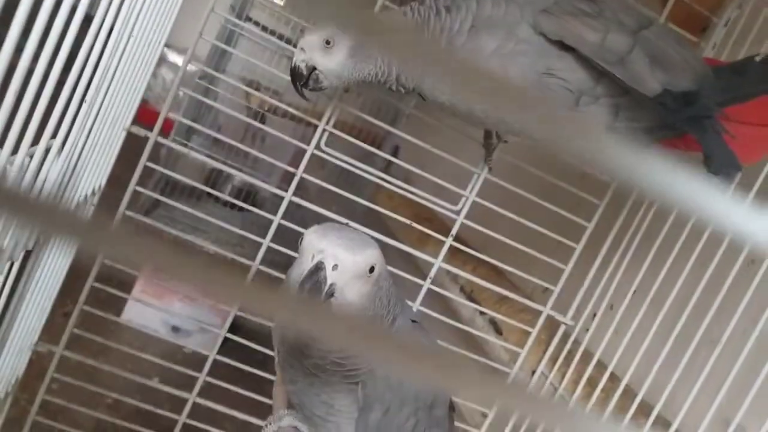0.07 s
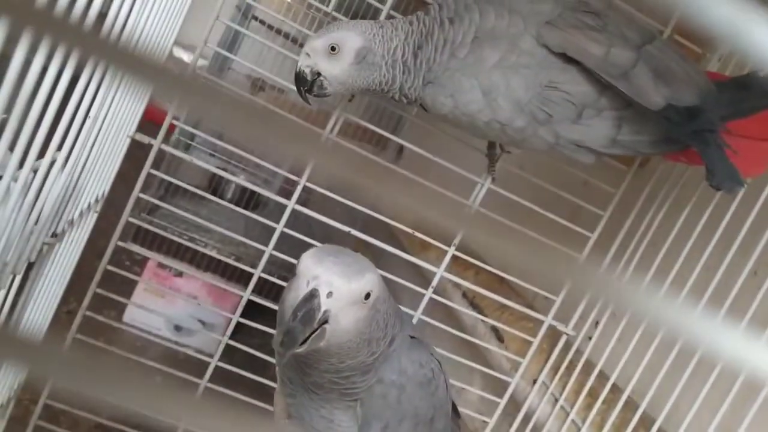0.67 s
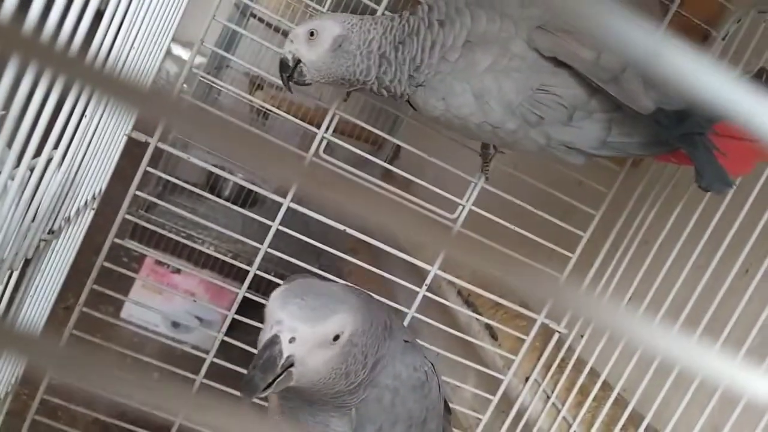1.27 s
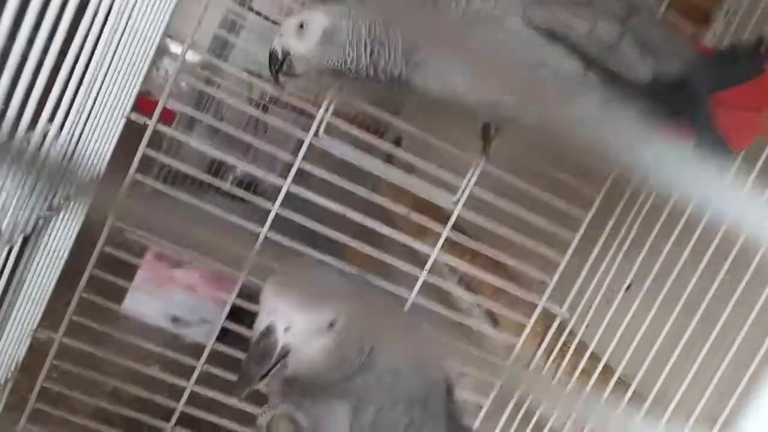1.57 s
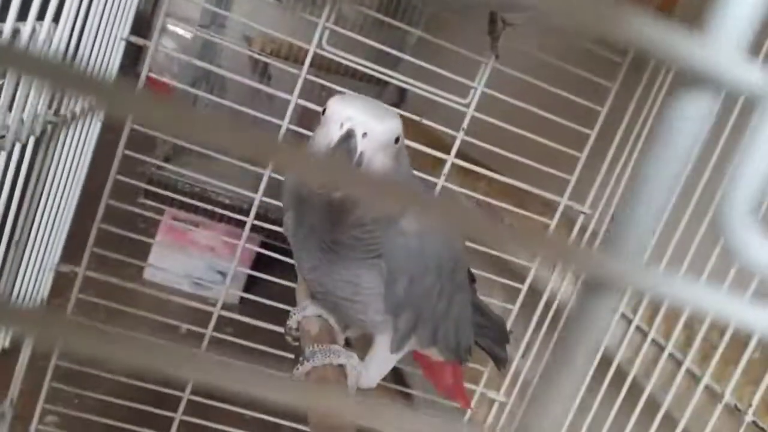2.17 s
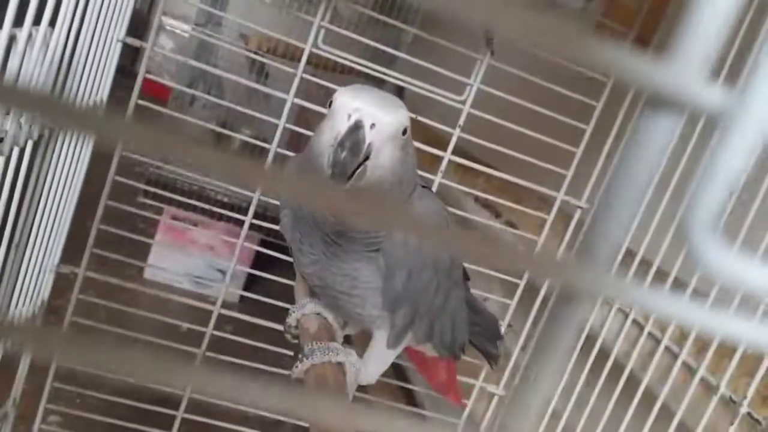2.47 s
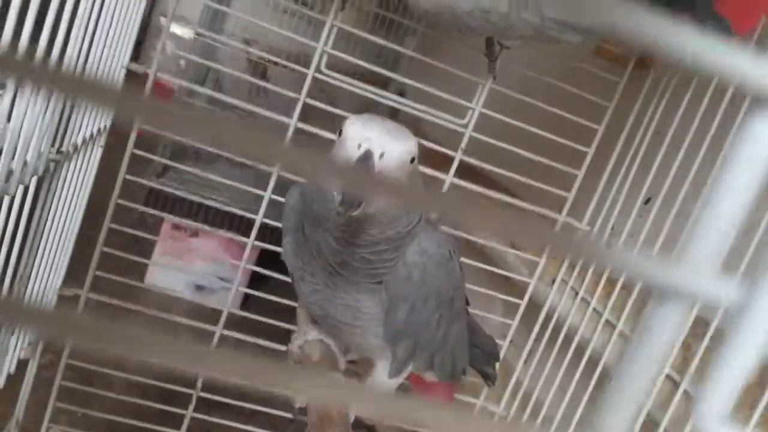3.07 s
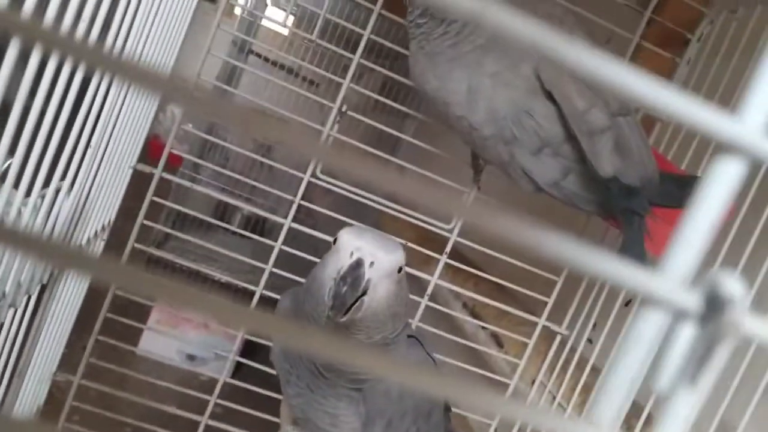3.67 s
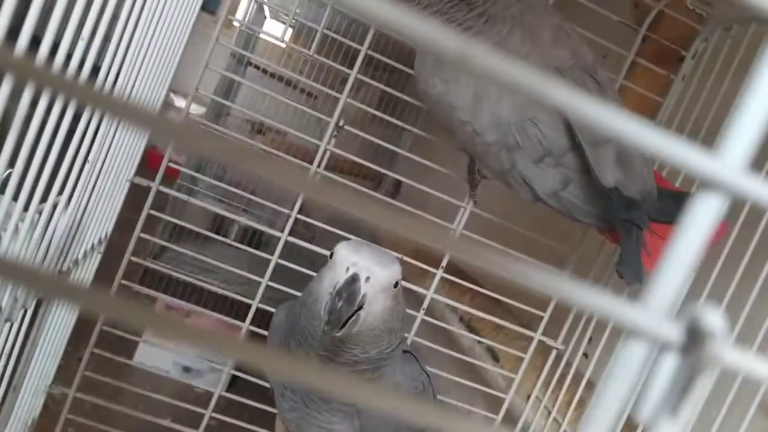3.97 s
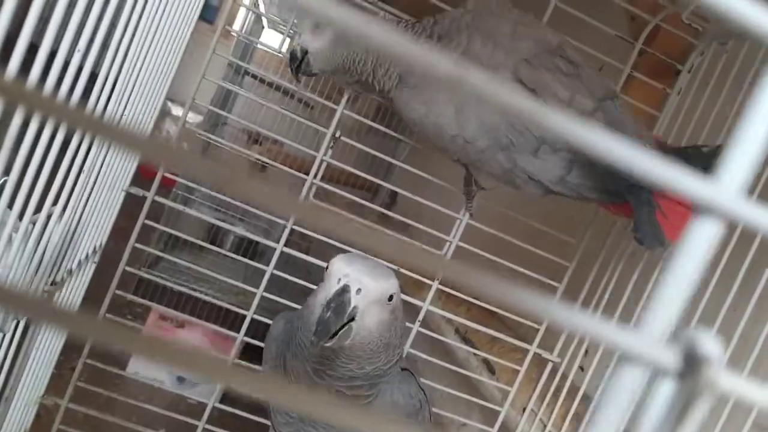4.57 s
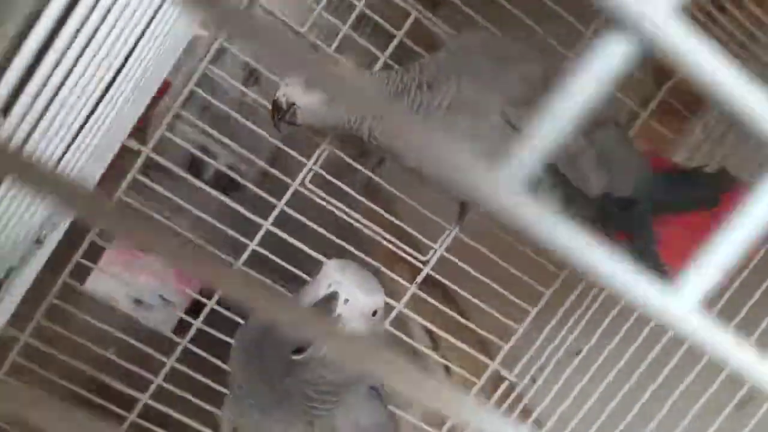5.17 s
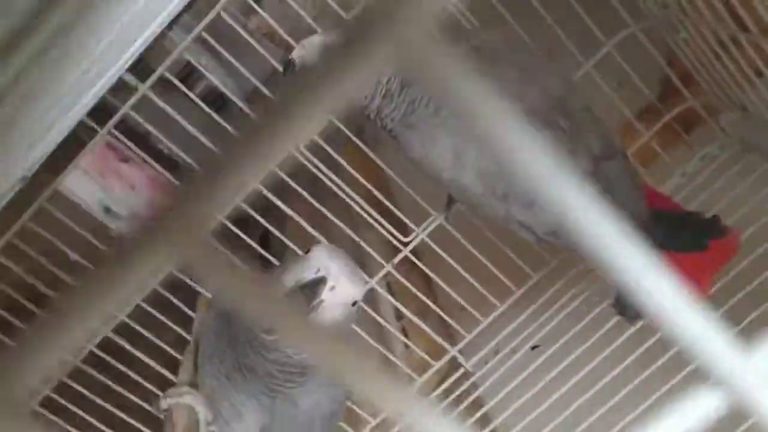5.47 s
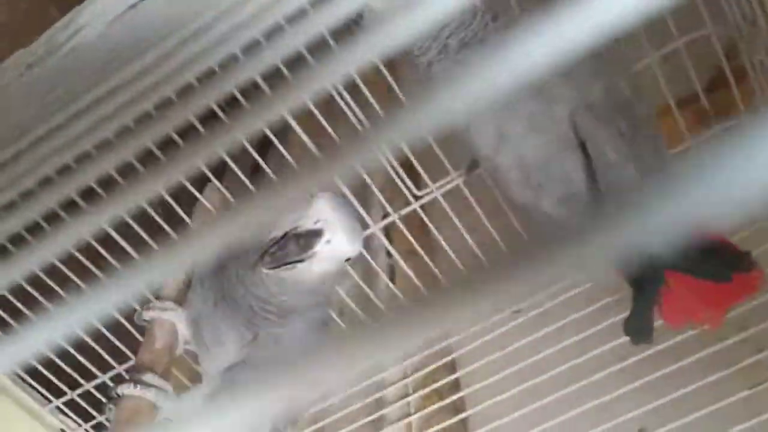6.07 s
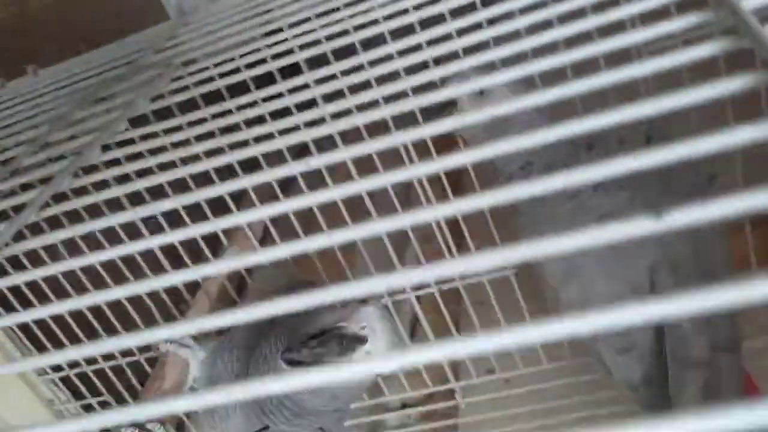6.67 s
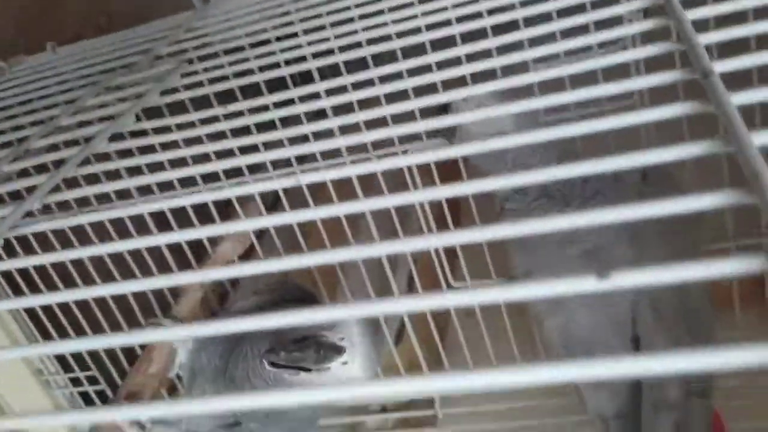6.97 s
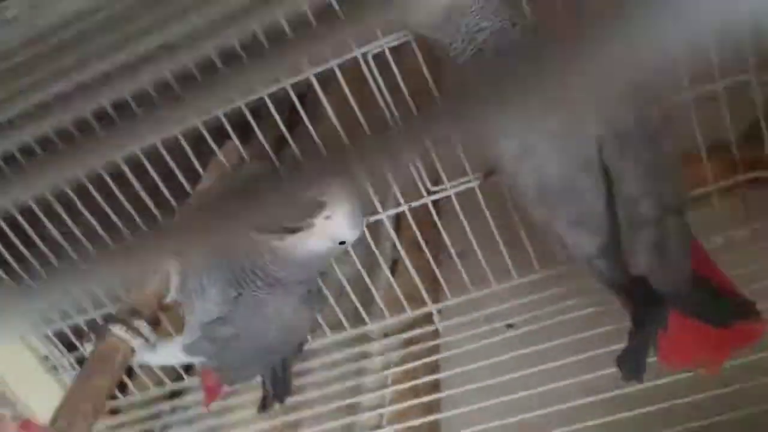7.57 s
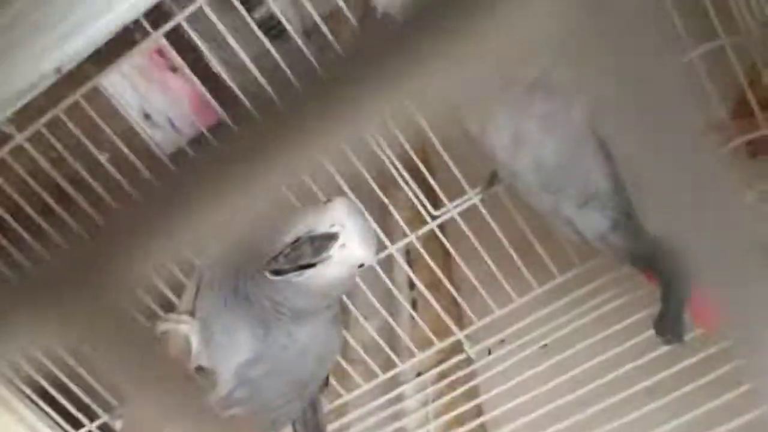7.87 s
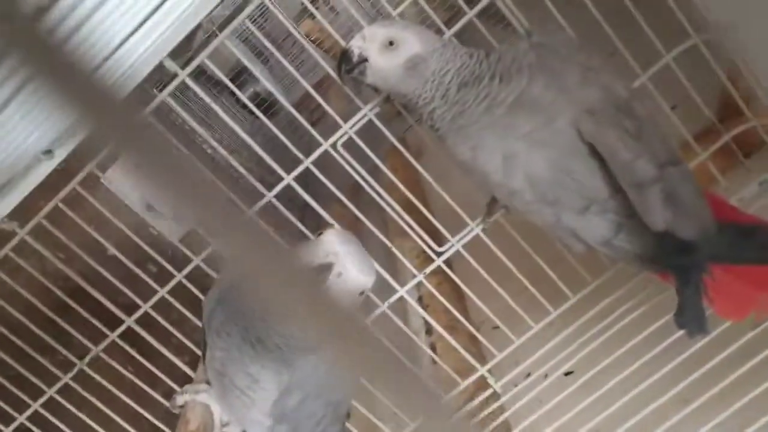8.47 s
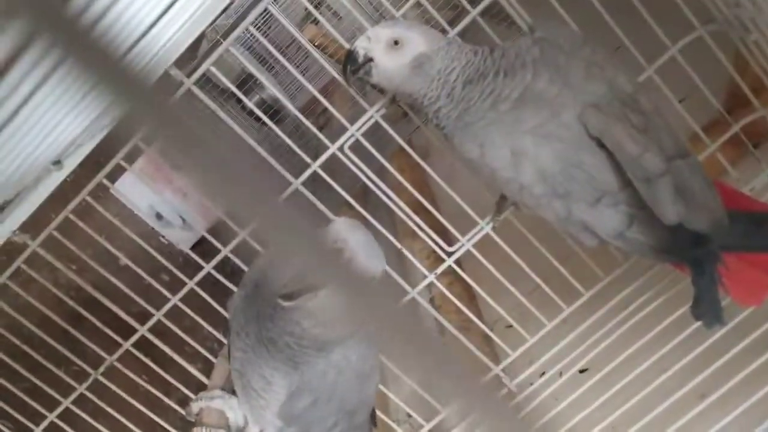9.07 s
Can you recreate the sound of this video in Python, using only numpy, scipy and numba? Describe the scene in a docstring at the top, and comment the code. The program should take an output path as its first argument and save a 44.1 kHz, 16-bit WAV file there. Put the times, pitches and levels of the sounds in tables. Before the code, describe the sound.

Two parrots call from a wire cage in a small, hard-walled room. Quick falling squawks and a run of thin, plunging chirps come first, then a nasal mew, short hisses, croaks and light beak clicks. After a quieter stretch, four long, harsh screams follow one another, loud enough to overload the microphone just outside the bars.

```python
"""Two grey parrots screaming

The birds sit in a wire cage in a small hard-walled room, heard from just outside the bars.
Falling squawks, plunging chirps, a mew, croaks, hisses and beak clicks lead up to four long screams.
Screams and croaks are slaps of the syrinx ringing the throat; squawks, chirps and mew are rough tones.
The screams overload the microphones and are held down by gain control."""
import sys
import numpy as np
from scipy import signal
from scipy.fft import rfft, irfft, next_fast_len
from scipy.io import wavfile
from scipy.ndimage import uniform_filter1d
from numba import njit

SR = 44100
rng = np.random.default_rng(int(sys.argv[2]) if len(sys.argv) > 2 else 0)


def dump(signal):
    """Clip the signal to [-1, 1] and save it as 16-bit WAV at the path in sys.argv[1]."""
    limited = np.clip(np.atleast_2d(signal).T, -1, 1)
    pcm = np.round(limited * 32767).astype(np.int16)
    wavfile.write(sys.argv[1], SR, pcm)


N = 410571
CUTOFF_HZ = 15800


# screams: start_s, swell_s, release_at_s, peak_db, sag_db, peak_pulse_hz, peak_tuning_ratio
SCREAMS = [(5.376, .15, .865, 6.5, 18, 237, 1.055), (6.607, .11, .69, 10, 18, 242, 1.04),
           (7.718, .15, .725, 8, 16, 236, 1.0), (8.965, .15, .75, 9.5, 12, 235, 1.01)]
# throat and beak resonances before tuning, one set per scream: centre_hz, width_hz, gain_db
THROATS = [
    [(1680, 386, 0), (2100, 323, 2.5), (3330, 710, -3), (4295, 380, -4.5), (5160, 690, -5.5),
     (6760, 580, -11), (8800, 1200, -12)],
    [(1615, 255, -2), (2136, 236, 2), (3540, 270, -3.5), (4340, 400, -9.5), (5380, 510, -8.5),
     (6230, 220, -11), (8310, 920, -12)],
    [(1667, 510, -2), (2200, 460, 1), (3630, 750, -4.5), (4350, 290, -6), (5330, 460, -5),
     (6460, 200, -7.5), (8600, 1600, -12)],
    [(1596, 310, -2.5), (2260, 530, 0.5), (3750, 470, -4.5), (4480, 300, -7.5), (5230, 280, -1.5),
     (5930, 340, -15), (8270, 680, -8)],
]

def screams(onset_db=24, release_s=.04, release_db=28, rate_per_db=.0034, tuning_per_db=.0028):
    """Effort swells, sags and is cut off; pulse rate and throat tuning follow it."""
    rough_start, rough_settled, settle_s = .92, .48, .28
    scoop_share, open_s = .08, .02
    out = np.zeros(N)
    for (start_s, swell_s, release_at_s, peak_db, sag_db, pulse_hz, tuning), throat in zip(SCREAMS, THROATS):
        end_s = release_at_s + release_s
        t = np.arange(0, end_s, 1 / SR)
        swell_db = -onset_db * np.maximum(1 - t / swell_s, 0) ** 2
        effort_db = swell_db - np.interp(t, [swell_s, release_at_s, end_s], [0, sag_db, sag_db + release_db])
        rough = rough_settled + (rough_start - rough_settled) * np.exp(-t / settle_s)
        opening = 1 + tuning_per_db * effort_db - scoop_share * np.exp(-t / open_s)
        voice = rasp(pulse_hz * (1 + rate_per_db * effort_db), rough, tuning * opening, throat)
        add(out, start_s, from_db(peak_db + effort_db) * voice)
    return out


# valleys between throat resonances, before tuning: centre_hz, width_hz, depth_share
THROAT_DIPS = [(1976, 106, 0.14), (3020, 550, 1), (5950, 810, 1), (7600, 280, 1)]

def rasp(pulse_hz, rough, tuning, throat, band_hz=(1000, 10000), buzz_hz=(650, 1400), buzz_db=-23):
    """Uneven slaps of the syrinx, each with a puff of turbulence, ring a trembling throat; rms near 1."""
    size = len(pulse_hz)
    jitter = .07 * rough ** 2 * wobble(size, 260) + .009 * wobble(size, 30)
    cycles = np.cumsum(pulse_hz * (1 + jitter)) / SR
    slaps = np.diff(np.floor(cycles), prepend=-1) * from_db(7 * rough * wobble(size, 300))
    puffs = rng.standard_normal(size) * np.exp(-4 * (cycles % 1))
    flow = rms_one(slaps) + rough ** 2 * rms_one(puffs)
    voice = 0
    for k, (hz, width_hz, gain_db) in enumerate(throat):
        # the moving tongue shifts each resonance
        centre_hz = hz * tuning * (1 + .016 * wobble(size, 16))
        gain = from_db(gain_db + 2 * wobble(size, 35))
        voice += (-1) ** k * gain * resonate(flow, centre_hz, width_hz)
    for hz, width_hz, depth in THROAT_DIPS:
        voice -= depth * resonate(voice, hz * tuning, width_hz)
    voice = butterworth(voice, 4, band_hz, "band")
    running_rms = np.sqrt(uniform_filter1d(voice ** 2, size=1500) + 1e-12)
    bare_buzz = butterworth(flow, 2, buzz_hz, "band")
    return voice / running_rms + from_db(buzz_db) * rms_one(bare_buzz)


# squawk tones: start_s, rise_s, fall_s, top_hz, end_hz, top_re_db, mid_fall_re_db, roughness
SQUAWKS = [(.036, .045, .07, 3830, 3250, -10, -8, .26), (.078, .035, .08, 3630, 2800, -7.5, -12, .22),
           (.138, .02, .062, 2400, 1780, -7, -4, .33), (.275, .09, .062, 2740, 1930, -17, -11.5, .36),
           (.625, .015, .06, 2130, 1450, -35, -24, .25), (2.785, .042, .042, 3850, 3050, -4, -2, .2),
           (2.864, .012, .048, 2450, 1800, -5, -5, .33), (3.148, .103, .072, 2670, 1900, -13, -8.5, .3),
           (4.965, .018, .04, 2560, 2450, -33, -38, .3), (7.598, .02, .025, 2340, 2290, -31, -38, .25)]
# open beak response: freq_hz, gain_db
OPEN_BEAK = [(700, -9.5), (1900, -5), (2400, -2), (3100, 1), (3800, 4), (5300, 1.5), (6300, -2),
             (7400, -1.5), (9500, -1), (11500, -21), (15500, -55)]

def squawks(level_db=-1, rise_oct_per_s=2.2, fall_rough=.14, attack_s=.018, attack_db=8, fade_db=3):
    """Arched calls: the pitch climbs, levels off, then drops as the tone roughens."""
    out = np.zeros(N)
    for start_s, rise_s, fall_s, top_hz, end_hz, top_db, mid_fall_db, rough in SQUAWKS:
        t = np.arange(0, rise_s + fall_s, 1 / SR)
        below_top_oct = rise_oct_per_s * rise_s * np.maximum(1 - t / rise_s, 0) ** 2
        fallen = np.maximum(t - rise_s, 0) / fall_s
        fall_ratio = (end_hz / top_hz) ** (np.sin(np.pi / 2 * fallen) ** 2)
        tone = whistle(top_hz * 2 ** -below_top_oct * fall_ratio, rough + fall_rough * fallen, OPEN_BEAK)
        envelope_db = np.interp(fallen, [0, .5, 1], [top_db, mid_fall_db, mid_fall_db - fade_db])
        envelope_db -= attack_db * np.maximum(1 - t / attack_s, 0)
        add(out, start_s, from_db(level_db + envelope_db) * tone)
    return out


def whistle(pitch_hz, rough, beak, chaos=.7, jitter=.04, flutter_db=7, flutter_hz=900, harmonics=14):
    """Harmonic tone through the beak; roughness (0-1) shakes it and mixes in noise; rms near 1."""
    size = len(pitch_hz)
    shaken_hz = pitch_hz * (1 + jitter * rough * wobble(size, flutter_hz))
    phase = 2 * np.pi * np.cumsum(shaken_hz) / SR
    orders = np.arange(1, harmonics + 1)[:, None]
    gains = from_db(at_hz(beak, orders * pitch_hz)) * (orders * pitch_hz < CUTOFF_HZ)
    tone = np.sum(gains * np.sin(orders * phase), 0) / np.linalg.norm(gains, axis=0)
    tone = rms_one(tone * from_db(flutter_db * rough * wobble(size, flutter_hz)))
    noise = butterworth(coloured(rng.standard_normal(size), beak), 3, 1900, "high")
    noise_gain = chaos * rough ** 2
    return (tone + noise_gain * rms_one(noise)) / np.hypot(1, noise_gain)


# chirps: start_s, whistle_hz, whistle_s, relative_db, low_note_hz
CHIRPS = [(.662, 5570, .031, -12, 1875), (.814, 5450, .031, -12.5, 1886), (.985, 5310, .028, -11.5, 1902),
          (1.15, 5660, .026, -11, 1893), (1.314, 5900, .02, -12, 2032), (1.478, 5690, .043, -13.5, 2060),
          (1.651, 5770, .022, -10, 2028), (1.897, 5920, .042, -13, 2300), (3.019, 5900, .043, -18, 2186),
          (5.102, 5840, .042, -13.5, 2265), (5.249, 6060, .028, -14.5, 2240)]
# narrow beak response: freq_hz, gain_db
NARROW_BEAK = [(1000, -34), (1900, -4), (2900, -2.5), (3800, 4), (4600, 5), (5600, -6), (6600, -10),
               (7700, -13), (9500, -11), (11500, -37), (15500, -49)]

def chirps(level_db=-1, swell_db=9, drop_db=7.5, catch_db=3, fade_db=4):
    """A thin whistle swells and slides down, then breaks through chaos to an overtone-rich low note."""
    break_s, low_s = .003, .052
    slide_share, high_rough, low_rough = .05, .14, .3
    out = np.zeros(N)
    for start_s, high_hz, high_s, high_db, low_hz in CHIRPS:
        slide_hz = high_hz * slide_share / 2
        low_start_s = start_s + high_s + break_s
        low_db = high_db - drop_db
        pitch_hz, envelope_db, rough = follow([
            (start_s, high_hz + slide_hz, high_db - swell_db, high_rough),
            (start_s + high_s / 2, high_hz, high_db, high_rough),
            (start_s + high_s, high_hz - slide_hz, high_db, high_rough),
            (low_start_s, low_hz * 1.1, low_db - catch_db, 1),
            (low_start_s + low_s / 2, low_hz, low_db, low_rough),
            (low_start_s + low_s, low_hz, low_db - fade_db, low_rough)])
        tone = whistle(pitch_hz, rough, NARROW_BEAK, chaos=1.8)
        add(out, start_s, from_db(level_db + envelope_db) * tone)
    return out


# mew contour: time_s, pitch_hz, relative_db, roughness
MEW = [(1.992, 934, -23, 0.4), (2.005, 809, -21.5, 0), (2.022, 879, -13, 0.04), (2.05, 1042, -13.5, 0.3),
       (2.08, 978, -21, .3), (2.1, 897, -22.5, .4), (2.125, 727, -25, 0.7)]
# nasal throat response: freq_hz, gain_db
MEW_THROAT = [(700, -4), (1000, -6.5), (2000, 1), (2700, -6.5), (3300, 1.5), (4250, -14), (5150, 6),
              (6200, -5), (7000, -12), (9400, -10), (12400, -20), (15500, -51)]

def mew(level_db=-1):
    """One low, arched, nasal call."""
    out = np.zeros(N)
    start_s = MEW[0][0]
    pitch_hz, envelope_db, rough = follow(MEW)
    add(out, start_s, from_db(level_db + envelope_db) * whistle(pitch_hz, rough, MEW_THROAT))
    return out


# noisy rushes: start_s, length_s, level_db, tilt_db_per_oct
RUSHES = [(0, .05, -29, -6), (.058, .021, -14, -3), (.711, .1, -23.5, -6), (2.345, .14, -28.5, -4.5),
          (2.642, .012, -25.5, 18), (2.748, .022, -18, -2), (2.766, .022, -6, -3.5),
          (3.857, .096, -39.5, -10.5), (3.961, .025, -28, 3), (4.147, .065, -32.5, -7),
          (4.557, .14, -36.5, 6), (8.858, .041, -15.5, 0), (8.879, .093, -14, -3.5)]
# rush spectrum: freq_hz, relative_db
RUSH_SPECTRUM = [(700, -88), (1100, -20), (1450, -8.5), (2200, -1.5), (3000, 2.5), (4500, 1.5), (5500, 9),
                 (6500, 7), (8300, 8.5), (10000, 3), (12000, -20), (15500, -64)]

def rushes(flutter_db=5, flutter_hz=220):
    """Fluttering noisy rushes: hisses and rustles, a faint opening squawk tail and one thin rasp."""
    out = np.zeros(N)
    for start_s, length_s, level_db, tilt_db_per_oct in RUSHES:
        size = int(length_s * SR)
        rush = coloured(rng.standard_normal(size), RUSH_SPECTRUM, tilt_db_per_oct)
        envelope = from_db(flutter_db * wobble(size, flutter_hz)) * signal.windows.tukey(size, .3)
        add(out, start_s, from_db(level_db) * rms_one(rush * envelope))
    return out


# croaks: start_s, length_s, level_db
CROAKS = [(2.095, 0.02, -21), (2.272, 0.016, -24), (3.869, 0.0092, -33), (4.87, 0.0091, -38),
          (4.931, 0.015, -37), (6.384, 0.022, -25), (8.618, 0.011, -27), (8.665, 0.021, -28)]

def croaks(pulse_hz=170, rough=.6, tuning=.89, muffle_hz=2200):
    """A few slaps of the syrinx with the beak nearly shut."""
    out = np.zeros(N)
    for start_s, length_s, level_db in CROAKS:
        steady = np.ones(int(length_s * SR))
        voice = rasp(pulse_hz * steady, rough * steady, tuning * steady, THROATS[0])
        add(out, start_s, from_db(level_db) * rms_one(butterworth(voice, 3, muffle_hz, "low")))
    return out


# loudest taps: start_s, relative_db
CLICKS = [(1.223, -19.5), (1.634, -20), (1.798, -17), (2.62, -22), (2.665, -25), (3.096, -14), (3.186, -17),
          (3.232, -16), (3.765, -26), (4.24, -20), (4.273, -22), (5.238, -18), (7.565, -20), (8.732, -21)]
# modes rung by a tap: freq_hz, gain_db, t60_s
CLICK_MODES = [(460, -25, 0.0092), (875, -13.5, .012), (1230, -12, 0.024), (1490, -11, 0.013),
               (1950, -5.5, 0.028), (2680, -8, .01), (4080, -14, 0.0089)]

def clicks(loud_offset_db=-2, faint_per_s=20, faint_db=-37, spread_db=4):
    """Beak and claw taps ring short modes; faint taps fall at random between the loud ones."""
    start_s, relative_db = np.transpose(CLICKS)
    faint = rng.random(N) < faint_per_s / SR
    taps = faint * from_db(faint_db + spread_db * rng.standard_normal(N))
    taps[(start_s * SR).astype(int)] = from_db(relative_db + loud_offset_db)
    hits = np.flatnonzero(taps)
    out = np.zeros(N)
    for hz, gain_db, t60_s in CLICK_MODES:
        strikes = np.full(N, 1e-18)
        strikes[hits] = taps[hits] * from_db(gain_db + rng.normal(0, 2, len(hits)))
        strikes[hits] *= rng.choice([-1, 1], len(hits))
        radius, angle = from_db(-60 / (t60_s * SR)), 2 * np.pi * hz / SR
        out += signal.lfilter([0, np.sin(angle)], [1, -2 * radius * np.cos(angle), radius ** 2], strikes)
    return out


# room decay: freq_hz, t60_s
ROOM_DECAY = [(200, 0.7), (1500, 0.47), (3000, 0.53), (6000, 0.45), (9000, 0.36), (15000, 0.083)]

def room(x, direct_db, early_db, tail_db, early_s=.0098, echoes_per_s=1500, coherence=.22, size=32768):
    """Direct sound, quick reflections from cage and wall, then a diffuse tail dying band by band."""
    t = np.arange(size) / SR
    bin_hz = np.arange(size // 2 + 1) * SR / size
    shared = np.sqrt(coherence) * rng.standard_normal(size)
    spectrum = rfft(shared + np.sqrt(1 - coherence) * rng.standard_normal((2, size)))
    centres_hz, decays_s = np.transpose(ROOM_DECAY)
    tail = 0
    for weights, t60_s in zip(np.eye(len(centres_hz)), decays_s):
        band = irfft(spectrum * at_hz(list(zip(centres_hz, weights)), bin_hz))
        tail += band * from_db(-60 * t / t60_s) * (t > .007)
    echoes = rng.standard_normal((2, size)) * (rng.random(size) < echoes_per_s / SR)
    early = echoes * np.exp(-t / early_s) * (t > .001)
    response = from_db(early_db) * early / np.linalg.norm(early, axis=1, keepdims=True)
    response += from_db(tail_db) * tail / np.linalg.norm(tail, axis=1, keepdims=True)
    response[[0, 1], [3, 0]] += from_db(direct_db)  # left lags by 3 samples
    return signal.fftconvolve(x[None], response, axes=1)[:, :N]


# room noise spectrum: freq_hz, relative_db
ROOM_NOISE = [(25, 7), (80, 1), (130, -6), (220, -6), (400, -8.5), (900, -8.5), (1900, -1.5), (3000, -5),
              (6000, -9), (9500, -5), (11500, -21), (15500, -24)]

def room_noise(level_db=-45, shared_gain=.65):
    """Soft, steady noise, partly shared by the two microphones."""
    noise = rng.standard_normal((2, N)) + shared_gain * rng.standard_normal(N)
    return from_db(level_db) * rms_one(coloured(noise, ROOM_NOISE))


def from_db(db):
    """Decibels to gain."""
    return 10 ** (np.asarray(db) / 20)


def rms_one(x):
    """Scale to rms 1."""
    return x / np.sqrt(np.mean(x ** 2) + 1e-20)


def at_hz(points, hz):
    """Read a table along a log-frequency axis."""
    freq_hz, value = np.transpose(points)
    return np.interp(np.log(np.maximum(hz, 1)), np.log(freq_hz), value)


def coloured(x, points, tilt_db_per_oct=0):
    """Shape by a spectrum, plus a tilt that pivots at 5 kHz and is flat below 1.5 kHz."""
    size = x.shape[-1]
    padded = next_fast_len(size)
    hz = np.arange(padded // 2 + 1) * SR / padded
    octaves = np.log2(np.maximum(hz, 1500) / 5000)
    gain = from_db(at_hz(points, hz) + tilt_db_per_oct * octaves)
    return irfft(rfft(x, padded) * gain, padded)[..., :size]


def butterworth(x, order, edge_hz, kind):
    """Causal low-, high- or band-pass."""
    return signal.sosfilt(signal.butter(order, edge_hz, kind, fs=SR, output="sos"), x)


@njit
def resonate(x, centre_hz, width_hz):
    """Two-pole resonance with a moving centre and peak gain 1."""
    y = np.zeros(len(x))
    r = np.exp(-np.pi * width_hz / SR)
    for i in range(2, len(x)):
        feedback = 2 * r * np.cos(2 * np.pi * centre_hz[i] / SR) * y[i - 1] - r * r * y[i - 2]
        y[i] = (1 - r * r) / 2 * (x[i] - x[i - 2]) + feedback
    return y


def wobble(size, rate_hz):
    """Ramps between random values drawn at rate_hz; rms 1."""
    steps = np.arange(size) * (rate_hz / SR)
    return rms_one(np.interp(steps, np.arange(size), rng.standard_normal(size)))


def follow(rows):
    """Per-sample curves from rows of time_s, values."""
    time_s, *columns = np.transpose(rows)
    t = np.arange(time_s[0], time_s[-1], 1 / SR)
    return [np.interp(t, time_s, column) for column in columns]


def add(track, start_s, sound, fade_s=.002):
    """Mix a sound into a track with faded edges."""
    first = round(start_s * SR)
    index = np.arange(len(sound))
    fade = np.minimum(np.minimum(index, index[::-1]) / (fade_s * SR), 1)
    track[first:first + len(sound)] += (sound * fade)[:N - first]


def scene(chirp_pan_db=1.57):
    """The birds in their room: chirps slightly left, clicks and croaks close by."""
    calls = room(screams() + squawks() + mew() + rushes(), direct_db=-3, early_db=-6, tail_db=-5)
    chirping = room(chirps(), direct_db=-2, early_db=-4, tail_db=-3.5)
    chirping *= from_db([[chirp_pan_db], [-chirp_pan_db]])
    close = room(clicks() + croaks(), direct_db=-2, early_db=-4, tail_db=-8)
    return calls + chirping + close + room_noise()


def overload(x):
    """The microphones flatten both halves of a loud wave toward full scale."""
    return x / (1 + x ** 4) ** (1 / 4)


def gain_control(x, ceiling_db=-10.5, release_db_per_s=60, window_samples=500):
    """Turn down at once whatever passes the ceiling, then recover steadily."""
    power = uniform_filter1d(np.mean(x ** 2, 0), window_samples).clip(1e-12)
    excess_db = np.maximum(10 * np.log10(power) - ceiling_db, 0)
    recovery_db = release_db_per_s * np.arange(N) / SR
    reduction_db = np.maximum.accumulate(excess_db + recovery_db) - recovery_db
    return x * from_db(-uniform_filter1d(reduction_db, window_samples))


# microphone response: freq_hz, left_db, right_db
MICROPHONES = [(20, 4.5, 2), (100, 2, -0.5), (175, 7.5, 4), (580, 9.5, 6.5), (1020, 2.5, 1),
               (1860, -1.5, -2.5), (5400, 0, -2.5), (7360, -2, -3), (8800, -5, 4), (9800, -13, 2.5),
               (10600, -6.5, 0), (15500, 0.5, -4)]

def record(dry, low_cut_hz=35, clip_level=.88):
    """Overload, low cut, microphone colour, gain control, hard clip and a steep top cut."""
    bent = butterworth(overload(dry), 1, low_cut_hz, "high")
    hz, *sides_db = np.transpose(MICROPHONES)
    heard = np.array([coloured(side, list(zip(hz, db))) for side, db in zip(bent, sides_db)])
    limited = np.clip(gain_control(heard), -clip_level, clip_level)
    return signal.sosfilt(signal.ellip(12, .1, 80, CUTOFF_HZ, fs=SR, output="sos"), limited)


dry = scene()
out = record(dry)
dump(out)
```